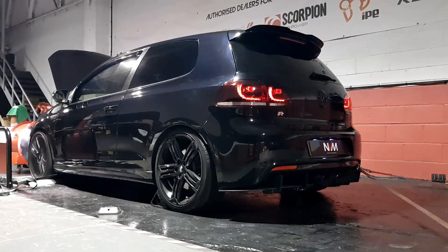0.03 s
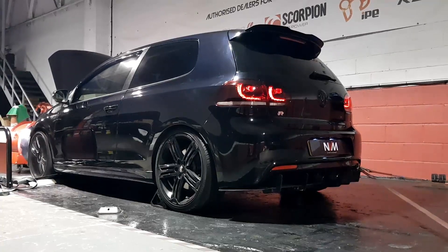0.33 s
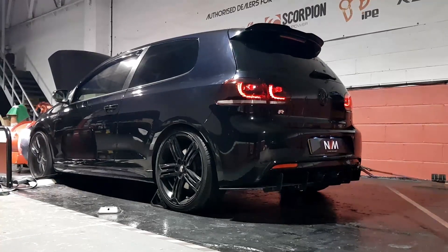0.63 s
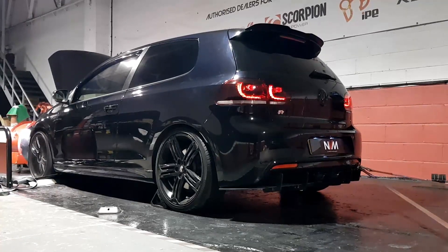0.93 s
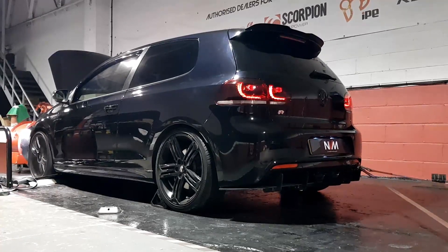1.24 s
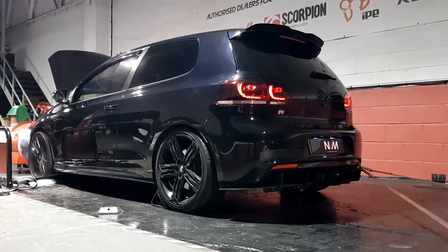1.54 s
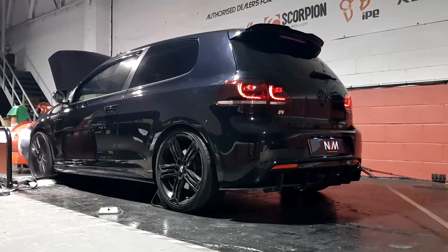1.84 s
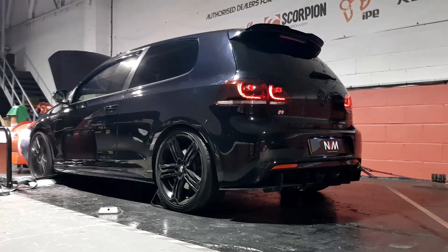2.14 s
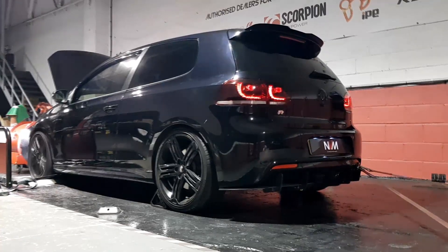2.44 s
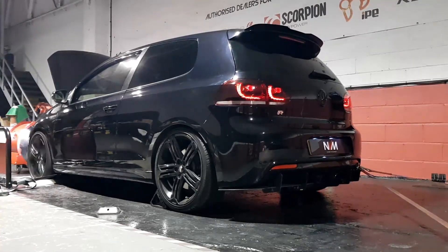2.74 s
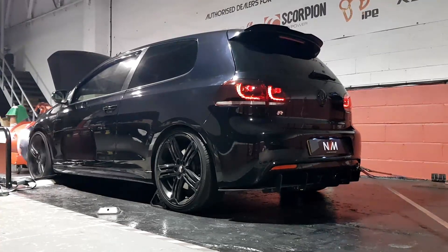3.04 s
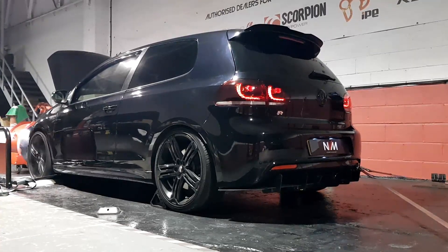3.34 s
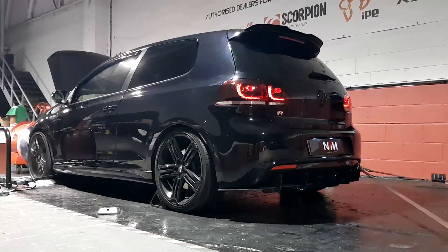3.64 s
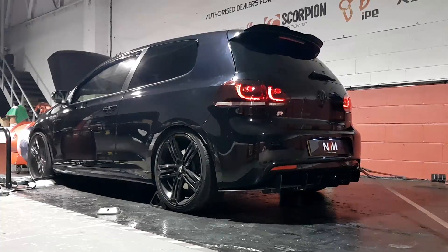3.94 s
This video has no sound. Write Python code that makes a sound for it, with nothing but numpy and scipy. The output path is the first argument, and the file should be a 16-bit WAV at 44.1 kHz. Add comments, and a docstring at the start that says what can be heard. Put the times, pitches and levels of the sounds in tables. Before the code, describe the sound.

A car's exhaust fires five quick, sharp bangs, sinks off the throttle with a hollow drone, then pulls up again, booming and raspy. Engine hiss and a faint whistle sit behind it in a hard-walled workshop.

```python
"""The exhaust of a tuned four-cylinder car running on rollers in a hard-walled workshop.
It bangs five times on cut ignition, sinks off the throttle with a hollow drone, then pulls up again,
booming and raspy. Pipe and room lift each order of the firing note in turn as the speed sweeps.
Gas leaves the tailpipes in puffs; behind it the engine bay hisses and the running gear whistles."""
import sys
import numpy as np
from scipy.fft import rfft, irfft, next_fast_len
from scipy.io import wavfile
from scipy.ndimage import uniform_filter1d, minimum_filter1d, map_coordinates

SR = 44100
rng = np.random.default_rng(int(sys.argv[2]) if len(sys.argv) > 2 else 0)


def log_audio(samples):
    """Write samples as a 16-bit WAV file to the path given in sys.argv[1]."""
    # one column per channel
    frames = np.atleast_2d(samples).T
    # limit to full scale, then quantise
    limited = np.clip(frames, -1, 1)
    pcm = np.round(limited * 32767).astype(np.int16)
    wavfile.write(sys.argv[1], SR, pcm)


N = 176400
TIME_S = np.arange(N) / SR


def amp(db):
    """Decibels to gain."""
    return 10 ** (np.asarray(db) / 20)


def unit_rms(x):
    """Scale to rms 1."""
    return x / np.sqrt(np.mean(x ** 2) + 1e-20)


def at_hz(rows, hz):
    """Interpolate (Hz, value) rows on a log axis."""
    row_hz, values = np.transpose(rows)
    return np.interp(np.log(hz + 1), np.log(row_hz + 1), values)


def curve(rows):
    """Interpolate (seconds, value) rows at every sample."""
    return np.interp(TIME_S, *np.transpose(rows))


def wobble(knots_per_s):
    """Smooth random curve."""
    return map_coordinates(rng.standard_normal(4096), [TIME_S * knots_per_s], mode="wrap")


def filtered(x, response):
    """Apply a gain given as a function of Hz."""
    size = next_fast_len(N + SR // 4)
    return irfft(rfft(x, size) * response(np.fft.rfftfreq(size, 1 / SR)), size)[..., :N]


# Each row: frequency in Hz, left-right correlation.
ROOM_CORRELATION = [(60, .99), (250, 0.86), (500, 0.43), (1000, -0.1), (2000, -0.21), (6000, 0)]

def room_noise(spectrum, ripple_db=0, ripple_hz=28):
    """Stereo noise of rms 1, diffuse in the treble; ripple adds small resonances of car and room."""
    heights = rng.standard_normal(SR // ripple_hz)

    def response(hz):
        angle = np.arccos(np.clip(at_hz(ROOM_CORRELATION, hz), -1, 1)) / 2
        ripple = np.interp(hz / ripple_hz, np.arange(len(heights)), heights)
        low_cut = np.minimum(hz / spectrum[0][0], 1) ** 2
        return amp(at_hz(spectrum, hz) + ripple_db * ripple) * low_cut * [np.cos(angle), np.sin(angle)]
    mid, side = filtered(rng.standard_normal((2, N)), response)
    return unit_rms(np.array([mid + side, mid - side]))


def partial(phase, spread, flutter, flutter_hz):
    """One stereo tone: a steady part plus fluttering reflections."""
    knots = rng.standard_normal((4, 1024))
    drift = [np.interp(TIME_S * flutter_hz, np.arange(1024), row) for row in knots]
    wave = np.exp(1j * phase)
    mid = (wave * (1 + flutter * (drift[0] + 1j * drift[1]))).real / np.sqrt(1 + flutter ** 2)
    side = spread * (wave * (1j + flutter * (drift[2] + 1j * drift[3]))).real
    return np.array([mid + side, mid - side])


# Each row: time in seconds, firing rate in Hz.
FIRING_HZ = [(0.0, 122.2), (0.44, 119.4), (0.62, 114.4), (1.22, 93.48), (1.62, 80.57), (2.02, 68.83),
             (2.12, 66.5), (2.42, 71), (2.62, 76.02), (2.82, 84.1), (3.02, 94.64), (3.32, 111.3),
             (3.72, 132.6), (3.92, 140.4), (4.0, 142.1)]

def firing_phase():
    """Phase in radians, one turn per firing."""
    return 2 * np.pi * np.cumsum(curve(FIRING_HZ)) / SR


def puffs(depth):
    """Gain of gas leaving in one puff per firing."""
    return unit_rms(np.exp(depth * np.cos(firing_phase())))


# Each row: centre in seconds, half length in seconds, pitch in Hz, level in dB.
GEAR_WHISTLES = [(2.08, .27, 1375, -38), (2.08, .25, 1485, -42), (2.07, .38, 4700, -41.5),
                 (2.05, .35, 2960, -41), (1.17, .07, 13080, -53)]

def whistles():
    """Thin, unsteady whistles from the running gear swell and fade."""
    out = np.zeros((2, N))
    for centre_s, half_s, hz, db in GEAR_WHISTLES:
        swell = amp(db) * np.exp(-((TIME_S - centre_s) / half_s) ** 4)
        out += swell * partial(2 * np.pi * hz * TIME_S, spread=.45, flutter=1, flutter_hz=min(hz / 28, 100))
    return out


# Each row: time in seconds, level in dB.
HISS_DB = [(0, -26), (.7, -31.5), (1.1, -32.5), (1.45, -33), (1.9, -27.5), (2.12, -25.5), (2.5, -31),
           (2.85, -42), (4, -36)]
AIR_DB = [(0, -38), (.5, -36.5), (.75, -41), (1.45, -45.5), (2, -41), (2.6, -40), (2.85, -43.5),
          (3.05, -39), (3.22, -44), (3.5, -34), (4, -32.5)]
# Each row: frequency in Hz, relative density in dB.
HISS_SPECTRUM = [(500, -21.5), (1400, 0), (2300, -5), (3000, -3.5), (3400, -5), (4700, -3.5), (5550, -5.5),
                 (6100, -21), (9000, -33)]
AIR_SPECTRUM = [(1000, -32), (3500, 1.5), (6200, -3.5), (7000, -6), (8000, -4.5), (9500, -8.5), (12500, -8),
                (16000, -23)]

def engine_bay():
    """Hiss coloured by the bay's resonant metal, to the right, and a high rush of air."""
    pan = amp([[-1.97], [1.97]])
    hiss = amp(curve(HISS_DB)) * room_noise(HISS_SPECTRUM, ripple_db=2.6, ripple_hz=55)
    air = amp(curve(AIR_DB) + .49 * wobble(24.83)) * room_noise(AIR_SPECTRUM, ripple_db=1.5)
    return hiss * pan + air * puffs(depth=.054)


# Each row: time in seconds, relative level in dB.
RUMBLE_DB = [(0, -15), (.4, -16.5), (.6, -30), (1.1, -34.5), (1.8, -29.5), (2.2, -26), (2.7, -24),
             (3.2, -20), (4, -17)]
RASP_DB = [(0, -23), (.4, -20), (.6, -27.5), (.76, -29.5), (1.45, -39.5), (2.1, -36), (2.5, -31),
           (2.9, -30.5), (3.2, -31.5), (3.35, -28.5), (4, -32)]
# Each row: frequency in Hz, relative density in dB.
RUMBLE_SPECTRUM = [(20, -57), (70, -13), (130, -12), (220, -0.5), (330, -1.5), (480, -7.5), (620, -30.5),
                   (1000, -29), (2500, -63)]
RASP_SPECTRUM = [(250, -4), (550, -1), (900, -1), (1300, -4.5), (2000, -8), (3200, -14.5), (5000, -39),
                 (8000, -42), (16000, -38.5)]

def tailpipe_gas():
    """Turbulent gas pulses out as rumble and rasp; a low shudder follows the firing note's level."""
    rumble = amp(curve(RUMBLE_DB)) * room_noise(RUMBLE_SPECTRUM)
    shudder = amp(curve(ORDER_1_DB) - 37) * room_noise([(30, 6), (110, -7), (300, -67)])
    rasp = amp(curve(RASP_DB) + 4.5 + .68 * wobble(35)) * room_noise(RASP_SPECTRUM, ripple_db=2)
    return rumble * puffs(depth=.16) + shudder + rasp * puffs(depth=.21)


# Each row: start in seconds, relative blast level in dB, crack level in dB.
BANGS = [(0.062, -12.5, -10.5), (.138, -12.5, -18), (0.213, -13, -21), (0.3, -12, -13),
         (0.388, -13.5, -17.5)]
# Each row: frequency in Hz, relative density in dB.
BLAST_SPECTRUM = [(55, -9), (135, -12), (240, 11), (400, 8.5), (800, 12.5), (1300, -0.5), (2200, -2.5),
                  (4200, -6.5), (6500, -17.5), (12000, -20), (16000, -49)]
BLAST_ATTACK_S, BLAST_T60_S = .004, .27
CRACK_T60_S, ECHO_T60_S, ECHO_DB = .012, .9, -11

def bangs():
    """Fuel burns unevenly in the exhaust: a sharp crack and a blast that rings on in the workshop."""
    blast_power, crack_power = np.zeros((2, N))
    for start_s, blast_db, crack_db in BANGS:
        age_s = np.maximum(TIME_S - start_s, 0)
        attack = 1 - np.exp(-age_s / BLAST_ATTACK_S)
        blast_power += (attack * amp(blast_db - 60 * age_s / BLAST_T60_S)) ** 2
        direct = amp(crack_db - 60 * age_s / CRACK_T60_S)
        echo = amp(crack_db + ECHO_DB - 60 * age_s / ECHO_T60_S)
        crack_power += (age_s > 0) * (direct + echo) ** 2
    crack_noise = room_noise([(500, -23), (3000, 3.5), (8000, -8.5), (13000, -11), (16000, -12)])
    blast = amp(8) * np.sqrt(blast_power) * room_noise(BLAST_SPECTRUM)
    crackle = amp(1.8 * wobble(400))
    return (blast + np.sqrt(crack_power) * crack_noise) * crackle


def ignition_cuts(lead_s=.014, width_s=.012, surge_s=.02):
    """Exhaust gain on cut ignition: a dip before each bang, a surge after it."""
    age_s = TIME_S - np.array(BANGS)[:, :1]
    dip_db = -7 * np.exp(-((age_s + lead_s) / width_s) ** 2)
    surge_db = 2.5 * np.exp(-((age_s - surge_s) / surge_s) ** 2)
    return amp((dip_db + surge_db).sum(axis=0))


# Orders 1-4 of the firing rate. Each row: time in seconds, peak level in dB.
ORDER_1_DB = [(0, -47.5), (1.5, -45), (1.85, -46), (2.48, -14.5), (2.76, -5), (2.88, -8), (2.98, -18.5),
              (3.5, -25.5), (3.8, -14), (4, -15.5)]
ORDER_2_DB = [(0, -14), (.47, -15.5), (.58, -10), (.68, -5.5), (.72, -13), (.81, -13), (.89, -9),
              (1.13, -12), (1.17, -8), (1.22, -10), (1.41, -5.5), (1.46, -18.5), (1.5, -17.5), (1.6, -33),
              (1.66, -22), (1.83, -17), (2.15, -20.5), (2.21, -32), (2.27, -20), (2.4, -24), (2.53, -8),
              (2.67, -4.5), (2.76, -28), (2.8, -8), (2.96, -5.5), (3.04, -20), (3.16, -10), (3.32, -14),
              (3.4, -8), (3.52, -29), (3.56, -8.5), (3.72, -19.5), (4, -11.5)]
ORDER_3_DB = [(0, -16), (.44, -13.5), (.62, -31.5), (.88, -21), (1.1, -48), (1.8, -43), (2.52, -17),
              (2.84, -11.5), (3.04, -11.5), (3.12, -6), (3.32, -8.5), (3.4, -15), (4, -19.5)]
ORDER_4_DB = [(0.0, -17), (0.44, -14.5), (0.52, -24.5), (0.6, -16), (0.681, -27), (0.76, -16),
              (0.84, -31.5), (1.16, -31), (1.36, -14.5), (1.48, -20), (1.52, -14), (1.68, -11.5),
              (1.88, -27), (2.68, -17), (2.76, -26.5), (3.08, -11), (3.2, -23), (3.4, -20), (3.76, -31.5),
              (3.99, -20.5)]
# Orders 5-14 and half orders 1.5-10.5. Each row: time in seconds, relative level in dB.
UPPER_ORDERS_DB = [(0, -13), (.52, -27.5), (.7, -16.5), (.9, -30), (1.2, -30), (1.7, -30.5), (2.5, -39),
                   (2.68, -28.5), (2.8, -46), (3, -26), (3.22, -18.5), (3.7, -33), (4, -18)]
HALF_ORDERS_DB = [(0.0, -38), (1.8, -65), (2.28, -26.5), (2.6, -30.5), (2.74, -26.5), (3.25, -33),
                  (3.68, -15), (3.99, -24)]
# Each row: frequency in Hz, gain in dB.
PIPE_RESPONSE = [(340, 5.5), (395, 0), (470, 3), (550, -9), (650, -3), (740, -11.5), (900, -8),
                 (1120, -15.5), (1350, -29), (2200, -32)]
HALF_ORDER_RESPONSE = [(90, -18), (190, -10), (250, 3), (335, 5.5), (440, -5), (600, -12.5), (1100, -20)]
LIFT_S, PULL_S, PEDAL_TRAVEL_S = .45, 1.98, .1808
COAST_ODD_DB, LOAD_TILT_DB_PER_OCT = -8.5, -.5

def exhaust_note():
    """Firing pulses in the pipe, summed as orders: clean when coasting, rough under load."""
    firing_hz = curve(FIRING_HZ)
    lifted = np.clip((TIME_S - LIFT_S) / PEDAL_TRAVEL_S, 0, 1)
    coasting = lifted * np.clip((PULL_S - TIME_S) / PEDAL_TRAVEL_S, 0, 1)
    load = 1 - coasting
    firing_rad = firing_phase() + .015 * load * wobble(55)
    out = np.zeros((2, N))
    for k, levels in enumerate([ORDER_1_DB, ORDER_2_DB, ORDER_3_DB, ORDER_4_DB], 1):
        gain = amp(curve(levels) + .9 * wobble(16))
        pipe_dispersion_rad = 1.5 * (k * firing_hz / 300) ** 4
        room_drift_rad = .45 * load * wobble(6)
        phase = k * firing_rad - np.pi / 2 - pipe_dispersion_rad + room_drift_rad
        out += gain * partial(phase, spread=.024 * k ** 1.67, flutter=.05 + .025 * k * load, flutter_hz=35)
    for k in range(5, 15):
        throttle_db = coasting * COAST_ODD_DB * (k % 2) + load * LOAD_TILT_DB_PER_OCT * np.log2(k / 6)
        gain = amp(curve(UPPER_ORDERS_DB) + at_hz(PIPE_RESPONSE, k * firing_hz) + throttle_db)
        phase = k * firing_rad + rng.uniform(0, 2 * np.pi)
        out += gain * partial(phase, spread=.26, flutter=.9, flutter_hz=14 + k * (2 + load))
    for k in np.arange(1.5, 11):  # from unequal cylinders
        gain = amp(curve(HALF_ORDERS_DB) + at_hz(HALF_ORDER_RESPONSE, k * firing_hz))
        phase = k * firing_rad + rng.uniform(0, 2 * np.pi)
        out += gain * partial(phase, spread=.22, flutter=.6, flutter_hz=10 + 3 * k)
    return out * 1


def scene():
    """The car, a little to the left."""
    exhaust = (exhaust_note() + tailpipe_gas()) * ignition_cuts()
    return (exhaust + engine_bay() + bangs() + whistles()) * amp([[.45], [-.45]])


CEILING, LIMIT_HOLD_S, TOP_HZ = .97, .004, 15900

def record(dry):
    """Peak limiter, then a band limit."""
    hold = int(LIMIT_HOLD_S * SR)
    needed_gain = CEILING / np.maximum(np.abs(dry).max(axis=0), CEILING)
    limited = dry * uniform_filter1d(minimum_filter1d(needed_gain, hold), hold)
    return filtered(limited, lambda hz: hz < TOP_HZ)


dry = scene()
out = record(dry)
log_audio(out)
```